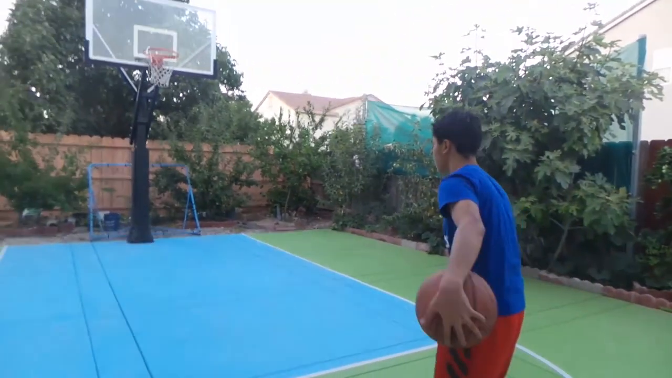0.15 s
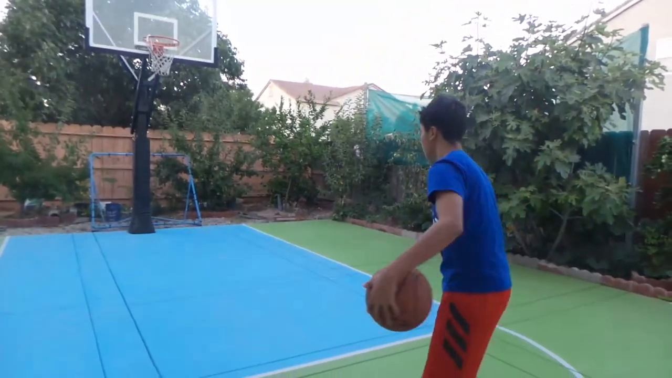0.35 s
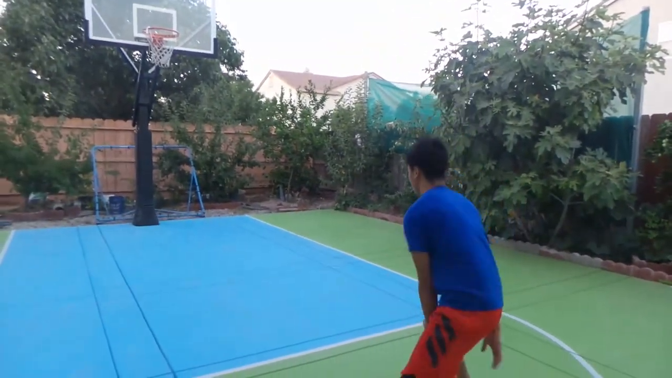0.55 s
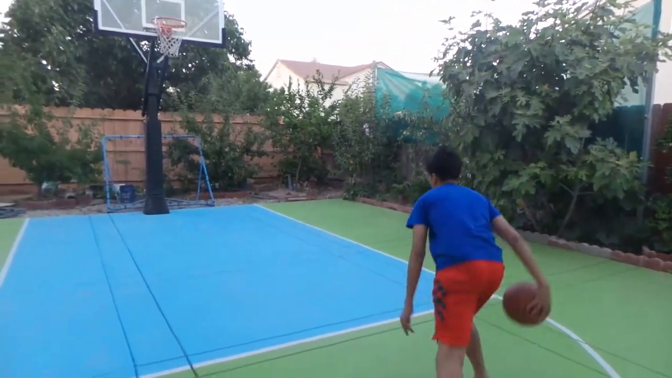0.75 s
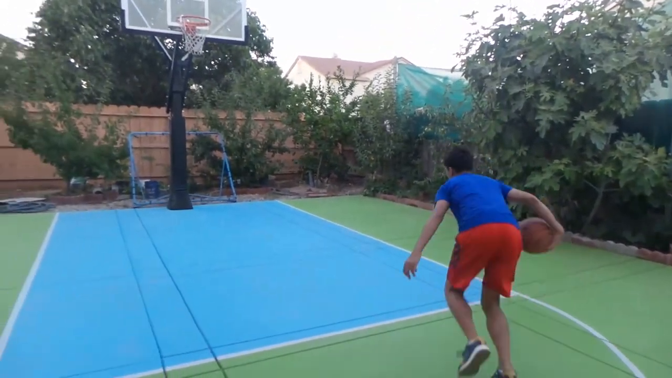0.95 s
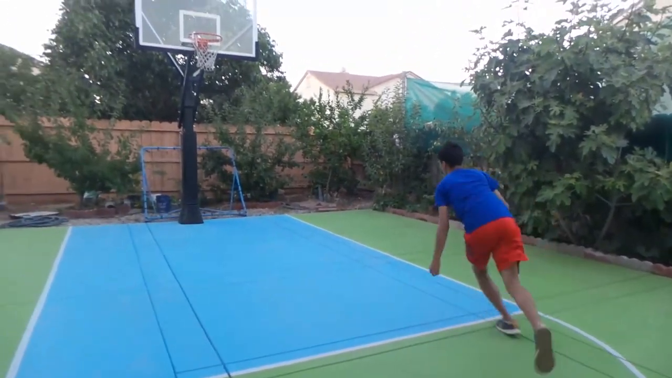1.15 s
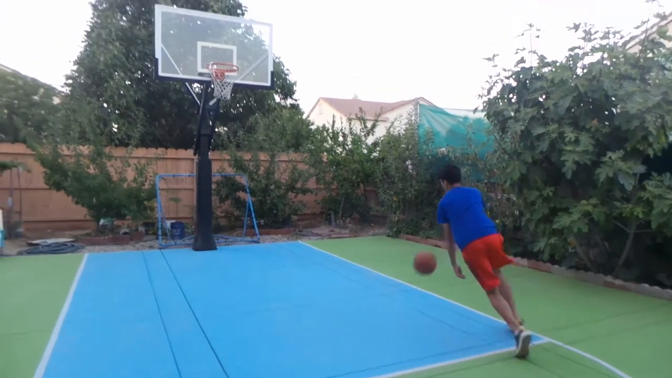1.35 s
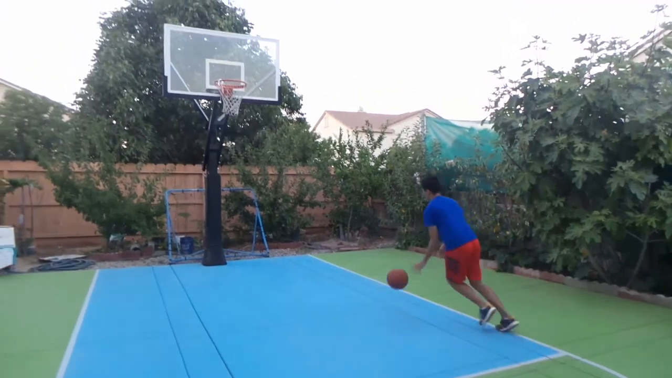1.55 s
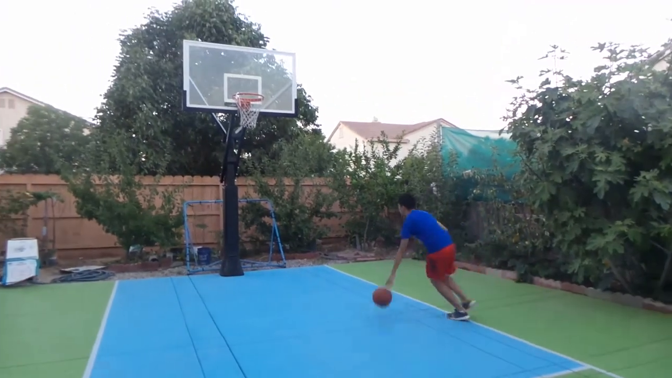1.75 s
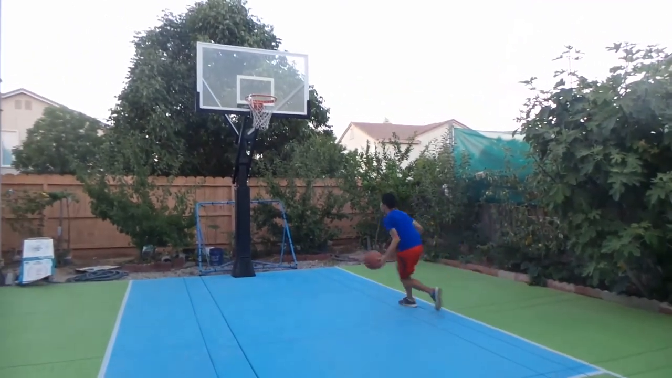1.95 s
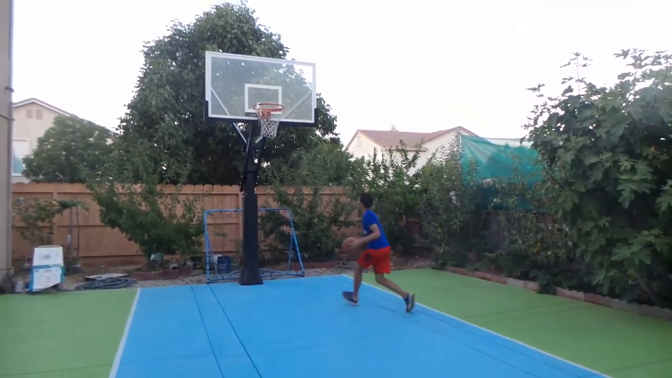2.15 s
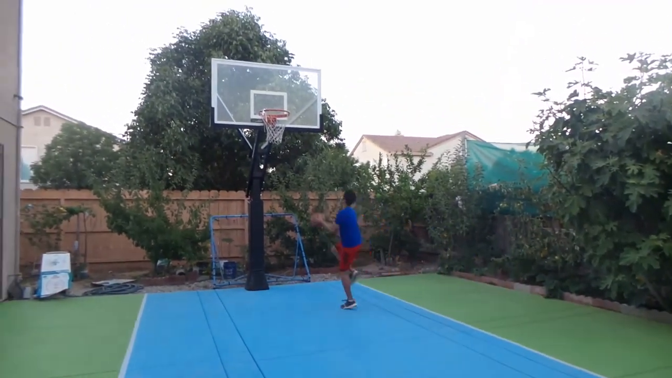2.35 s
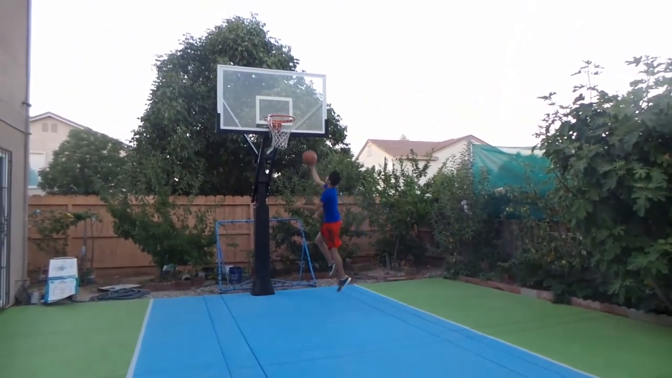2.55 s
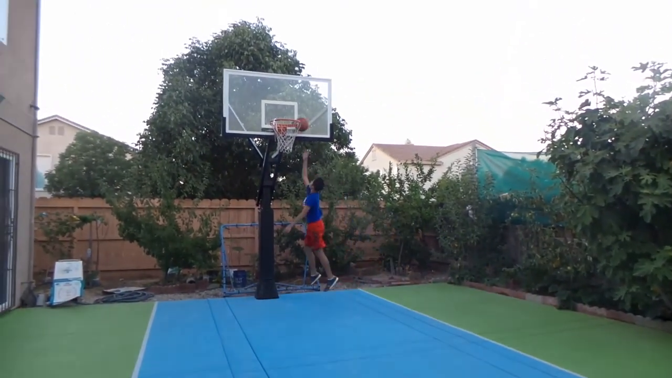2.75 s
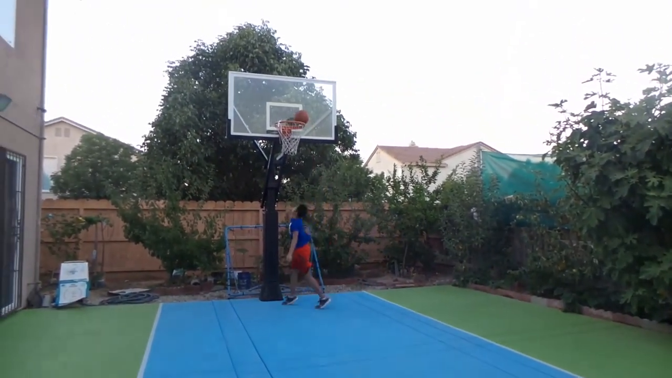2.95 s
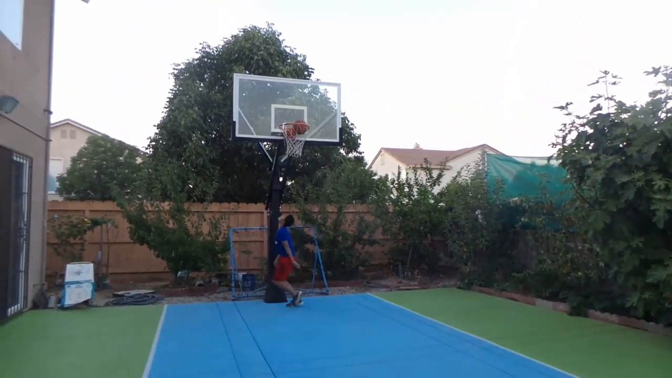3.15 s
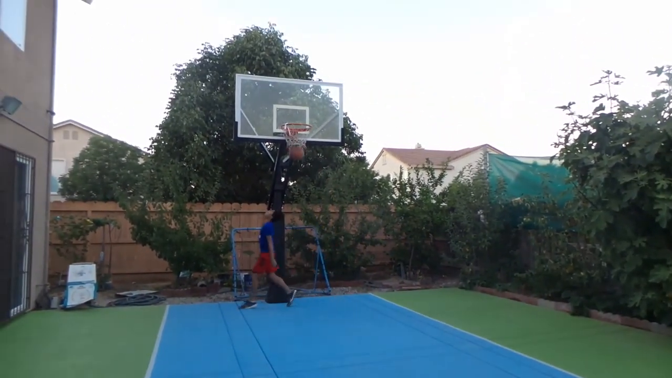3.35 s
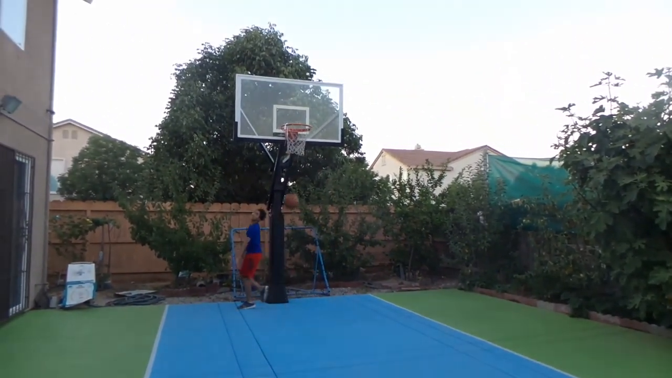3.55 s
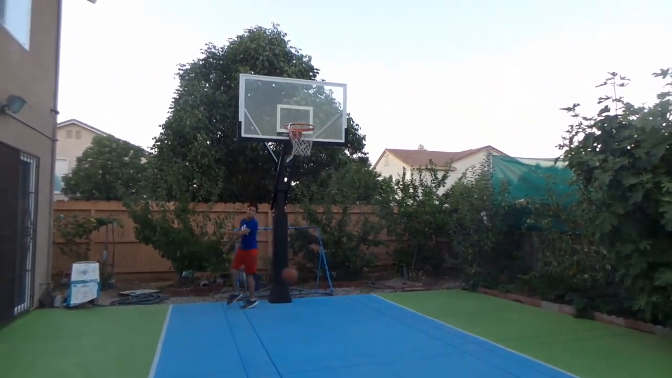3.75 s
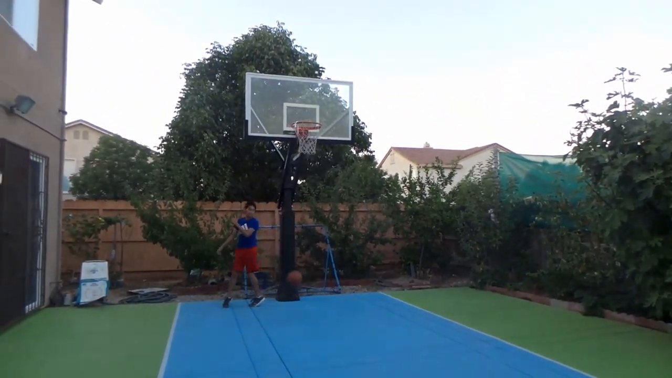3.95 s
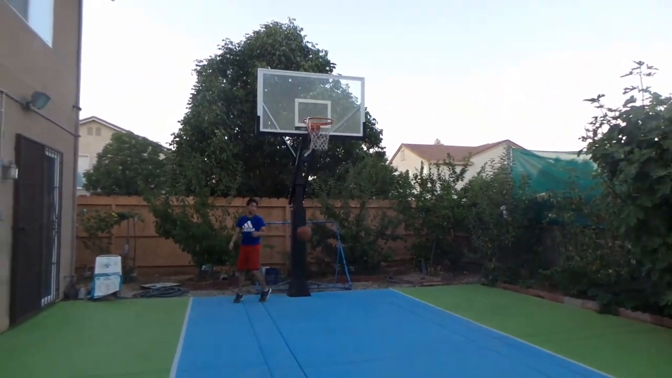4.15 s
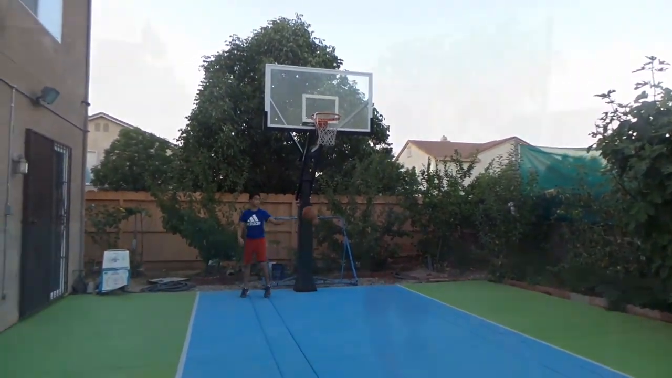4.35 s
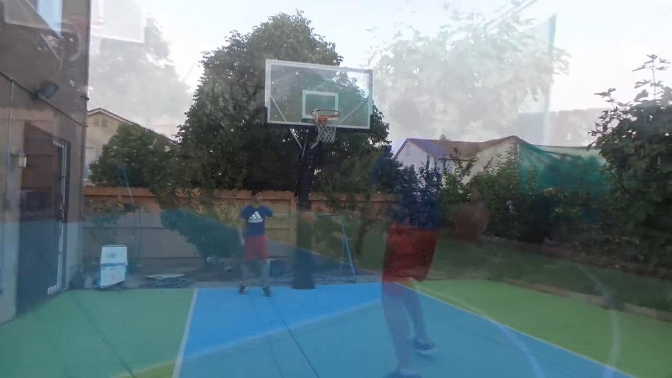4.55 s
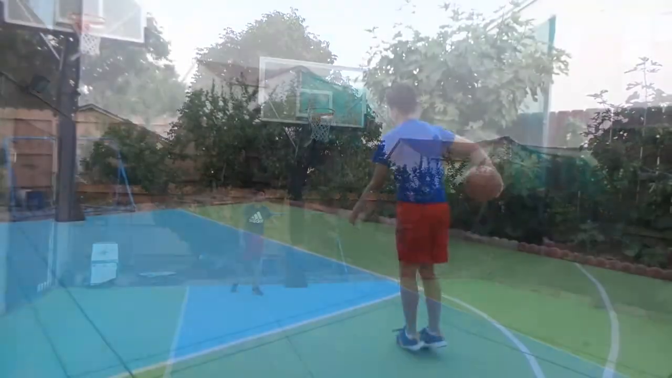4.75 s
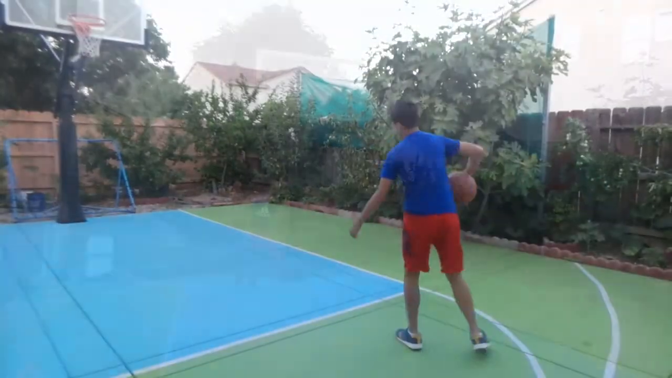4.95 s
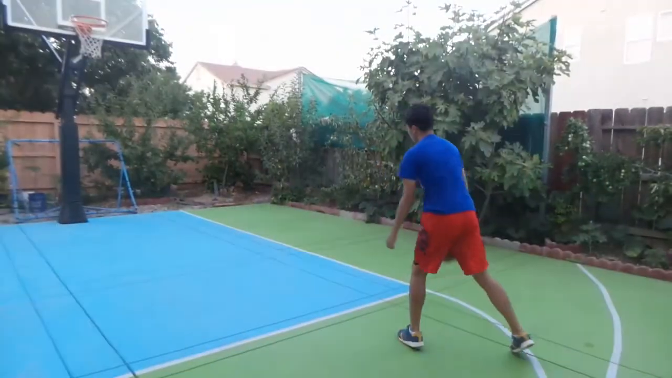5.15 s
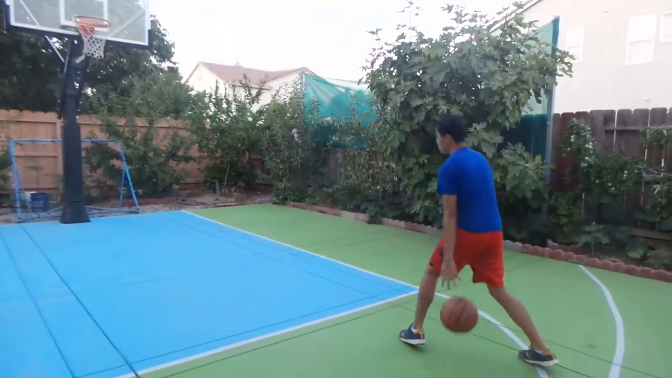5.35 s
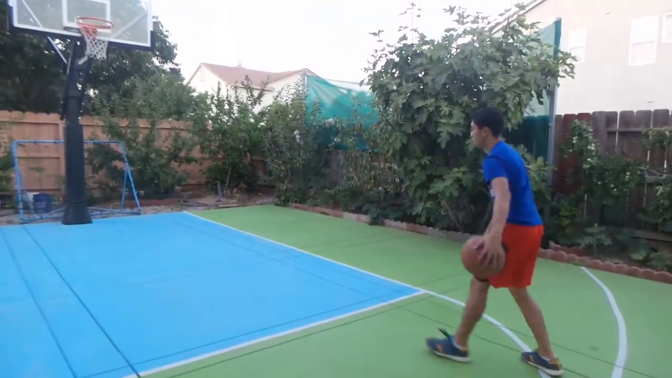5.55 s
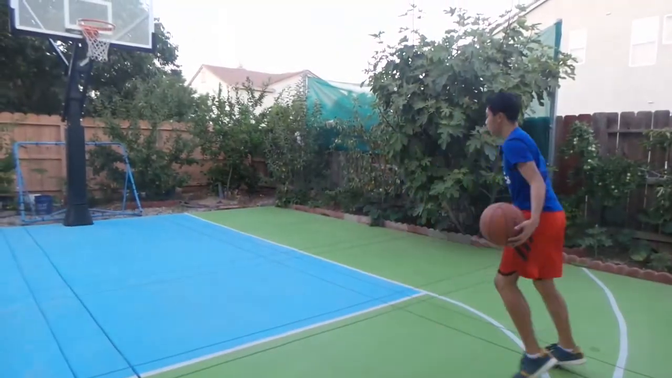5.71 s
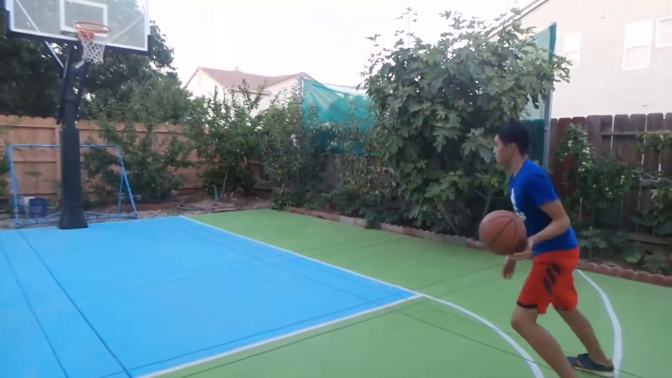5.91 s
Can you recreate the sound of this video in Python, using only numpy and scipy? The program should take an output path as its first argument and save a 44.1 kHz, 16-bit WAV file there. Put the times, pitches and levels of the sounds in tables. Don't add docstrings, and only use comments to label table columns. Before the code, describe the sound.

Irregular dribbling cracks and thumps between fences and walls, soles scuff and knock, far traffic hums, and a faint shrill squeal arches near the end.

```python
import sys
import numpy as np
from scipy import signal
from scipy.fft import rfft, irfft
from scipy.io import wavfile
from scipy.ndimage import uniform_filter1d, minimum_filter1d

SR = 44100
rng = np.random.default_rng(int(sys.argv[2]) if len(sys.argv) > 2 else 0)


def amplitude_ratio(level_db):
    exponent = np.asarray(level_db, float) / 20
    return 10 ** exponent


def file_out(sig):
    cols = np.atleast_2d(sig).T
    lim = np.clip(cols, -1, 1)
    pcm = np.round(lim * 32767).astype(np.int16)
    wavfile.write(sys.argv[1], SR, pcm)


N = 268128
LENGTH = 24576


def unit(x):
    return x / np.sqrt(np.mean(x ** 2))


def colour(x, spectrum):
    hz, db = np.transpose(spectrum)
    f = np.arange(len(x) // 2 + 1) * SR / len(x) + 1
    gain_db = np.interp(np.log(f), np.log(hz), db, left=-70, right=-70)
    return irfft(rfft(x) * amplitude_ratio(gain_db), len(x))


def walk(rate):
    k = int(SR / rate)
    held = np.repeat(rng.standard_normal(N // k + 1), k)
    return 1.3 * uniform_filter1d(uniform_filter1d(held, k), k)[:N]


def fade(t60):
    return np.exp(-np.log(1000) * np.arange(LENGTH) / SR / t60)


def ring(modes, scatter_db, detune):
    t = np.arange(LENGTH) / SR
    x = np.zeros(LENGTH)
    for hz, db, t60 in modes:
        strength, shift = rng.standard_normal(2)
        x += amplitude_ratio(db + scatter_db * strength) * np.sin(2 * np.pi * hz * (1 + detune * shift) * t) * fade(t60)
    return x / np.abs(x).max()


def burst(low_hz, t60, click):
    x = rng.standard_normal(LENGTH) * fade(t60) * (1 - fade(.004))
    x[:7] -= click * np.hanning(7)
    return signal.sosfilt(signal.butter(1, low_hz, "high", fs=SR, output="sos"), x)


def add(out, s, x):
    i = int((s + .0007) * SR)
    out[i:i + len(x)] += x[:len(out) - i]


# time_s, level_db
TRAFFIC = [(0, -2.5), (.4, -5.5), (1.0, 0), (1.6, 4), (2.2, 3.5), (2.55, 1.5), (2.9, 3.5), (3.25, 7.5),
           (3.55, 1.5), (4.0, 3), (4.5, -3), (5.2, -6), (5.6, -1), (6.08, -3.5)]
# freq_hz, density_db
RUMBLE = [(25, 2), (108, 5.5), (168, -1.5), (221, 3.5), (270, -6), (400, -7), (520, -35), (880, -70)]
ROAR = [(180, 5), (300, 1), (661, 3.5), (1000, 1.5), (2200, -14.5), (3000, -17.5), (3900, -48), (5000, -70)]
HISS = [(880, 6), (1500, -3.5), (2680, -14.5), (2910, -6), (3970, -7), (15100, -12), (16000, -16),
        (16500, -48)]


def traffic():
    t, echo = np.arange(N) / SR, far_walls()
    near_db = np.interp(t, *np.transpose(TRAFFIC))
    out = np.zeros(N)
    # spectrum, level_db, share of the nearness, echo_db, flicker_db
    layers = [(RUMBLE, -48, .6, -20, 2.7), (ROAR, -49, 1.05, -30, .4), (HISS, -59, .4, -34, .2)]
    for spectrum, db, share, echo_db, flicker_db in layers:
        noise = unit(colour(rng.standard_normal(N), spectrum))
        strength = np.hypot(amplitude_ratio(db + share * near_db), amplitude_ratio(echo_db) * echo)
        out += noise * strength * amplitude_ratio(flicker_db * walk(9))
    return out


# time_s, level_db
MOTOR = [(0, -73), (.2, -76), (1.3, -73), (1.6, -81), (4.0, -79), (4.5, -77), (4.7, -88), (6.08, -88)]


def motor():
    t = np.arange(N) / SR
    tone = np.sin(2 * np.pi * np.cumsum(2870 + 16 * walk(60)) / SR)
    return tone * amplitude_ratio(np.interp(t, *np.transpose(MOTOR)) + 3.5 * walk(15))


# centre_s, pitch_hz, level_db, length_s
WHINES = [(.08, 1940, -51, .18), (0.757, 2040, -40.5, 0.38), (1.07, 1470, -46, .16),
          (1.35, 1906, -42, 0.41), (2.25, 2017, -41.5, 0.41), (2.66, 1470, -53, 0.099),
          (2.75, 1143, -41, 0.31), (3.2, 2000, -71, 0.15), (4.152, 2010, -49, 0.37),
          (5.713, 1920, -45, 0.21)]


def whines():
    out = np.zeros(N)
    # ratio to pitch, level_db
    band = [(.75, -25), (.96, -12), (1, 0), (1.04, -12), (1.3, -20), (1.65, -30)]
    for s, hz, db, length_s in WHINES:
        passing = np.exp(-(2 * (np.arange(LENGTH) - LENGTH / 2) / SR / length_s) ** 2)
        noise = unit(colour(rng.standard_normal(LENGTH), [(k * hz, d) for k, d in band]))
        song = noise * passing * amplitude_ratio(db - 9)
        start = s - LENGTH / 2 / SR
        add(out, max(start, 0), song[int(max(-start, 0) * SR):])
    return out


# delay_ms, level_db
FENCES = [(3.5, -6), (8.5, -9.5), (12.5, -14.5), (24, -30)]
# freq_hz, level_db under the blow, t60_s
YARD = [(78.5, -12, 0.64), (160, -3, 0.34), (333, -4.5, 0.41), (650, -2, 0.23), (1220, -11, 0.49),
        (2590, -14.5, 0.38), (4400, -18, 0.34), (9050, -13.5, 0.27)]


def yard(x, blow, rise_s):
    out = x.copy()
    for (ms, db), shift in zip(FENCES, rng.uniform(-0.2, 0.12, len(FENCES))):
        lag = int(ms * (1 + shift) * SR / 1000)
        out[lag:] += amplitude_ratio(db) * x[:-lag]
    f = np.arange(LENGTH // 2 + 1) * SR / LENGTH + 1
    grains = rng.standard_normal(LENGTH) * amplitude_ratio(2.0 * rng.exponential(size=LENGTH))
    spray = rfft(grains)
    blow_hz, blow_db = np.transpose(blow)
    for hz, db, t60 in YARD:
        octave = np.clip(1 - np.abs(np.log2(f / hz)), 0, 1) ** .5
        band = irfft(spray * octave) * fade(t60)
        band /= np.sqrt(np.sum(band ** 2) / np.sum(fade(t60) ** 2))
        level_db = db + np.interp(np.log(hz), np.log(blow_hz), blow_db)
        out += amplitude_ratio(level_db) * band * (1 - fade(rise_s + 1.13 / hz))
    return out


# start_s, tick_db, knock_db, knock_hz,
# boom_db
KNOCKS = [(0.4712, -27.5, -32, 402, -44), (0.7081, -39, -30.5, 497, -33.5), (1.1301, -43, -39, 390, -38.5),
          (1.1549, -29, -32, 758, -33), (1.6491, -46, -37, 720, -31.5), (1.966, -20.5, -21.5, 760, -21),
          (2.2612, -28, -30, 342, -28), (2.7604, -55, -41.5, 635, -44), (2.9799, -47, -34.5, 383, -28),
          (3.0334, -24.5, -30.5, 321, -34), (3.3765, -42, -36, 593, -39.5), (4.6932, -45.5, -62, 357, -49),
          (5.2352, -53, -46, 656, -58), (5.8013, -55, -46, 566, -35), (5.907, -40.5, -48, 740, -49),
          (5.9309, -43, -40.5, 650, -44.5),
          (1.4221, -24.5, -30.5, 440, -30.5),
    (5.69, -60, -58, 460, -41),
    (4.78, -62, -52, 460, -51),
]


def knocks():
    out = np.zeros(N)
    contact = np.interp(np.arange(LENGTH) / SR, [0, .006, .008], [1, 1, .3])
    for s, tick_db, knock_db, knock_hz, boom_db in KNOCKS:
        tick = amplitude_ratio(tick_db + 4) * uniform_filter1d(burst(900, .03, click=1.0), 6)
        hollow = [(knock_hz, 0, .1), (1.45 * knock_hz, -11, .06),
                  (2.1 * knock_hz, -8, .05), (3.2 * knock_hz, -15, .04)]
        knock = -amplitude_ratio(knock_db + 11) * contact * ring(hollow, 1.5, .015)
        ground = [(109.0, 0.0, 0.061), (205.7, -4.0, 0.14), (313.0, -4.5, 0.15)]
        boom = amplitude_ratio(boom_db + 6.5) * ring(ground, 6.6, 0.077) * (1 - fade(.02))
        blow = [(150, boom_db - 3), (700, knock_db - 5), (3000, tick_db - 4), (9000, tick_db - 13)]
        add(out, s, yard(tick + knock + boom, blow, rise_s=.04))
    return out


# start_s,
# pitch_hz, level_db
PINGS = [(.606, 750, -15), (.709, 1180, -26), (1.4624, 1370, -10), (1.838, 910, -20), (1.972, 2230, -21),
         (3.891, 1200, -12.5), (4.922, 2343, -21), (5.2985, 1810, -8), (5.322, 1390, -15.5),
         (.472, 796, -23.5), (4.268, 1110, -37)]


def pings():
    out = np.zeros(N)
    touch = np.interp(np.arange(LENGTH) / SR, [0, .001, .0045, .007], [0, 1, 1, .15])
    for s, hz, db in PINGS:
        ping = amplitude_ratio(db) * ring([(hz, 0, .06), (1.33 * hz, -3, .05)], 1, .005) * touch
        band = [(.75 * hz, -25), (.9 * hz, -3), (hz, 0), (1.1 * hz, -6), (1.3 * hz, -25)]
        linger_db = db - 12 - 16 * abs(np.log2(hz / 1200))
        linger = amplitude_ratio(linger_db) * unit(colour(rng.standard_normal(LENGTH), band))
        linger = linger * fade(.42) * (1 - fade(.03))
        blow = [(hz / 2, db - 43), (hz, db - 16), (2 * hz, db - 40)]
        add(out, s, linger + yard(ping, blow, rise_s=.01))
    return out


# freq_hz, density_db
SOLE = [(1470, -40), (2500, -5.5), (2710, -2.5), (3170, -6.5), (5820, -5), (13900, -7.5), (16100, -10),
        (16500, -56)]
# full_strength_s, hiss_db, rise_s, hold_s, rasp_db relative to the hiss
SCUFFS = [(0.478, -41, 0.0039, .004, -19), (0.71, -36.5, .005, .006, 2), (0.825, -53.5, 0.056, 0.032, -1),
          (0.88, -50, .05, 0.011, -3), (1.149, -39, 0.027, 0.023, -4), (1.433, -35, .006, 0.016, -10),
          (1.654, -50.5, 0.018, .006, 8), (1.706, -35, 0.02, 0.0072, -0.5), (1.924, -43, .02, 0.021, -2),
          (2.215, -50.5, .022, 0.056, 11), (2.733, -50, 0.015, 0.0069, 7), (3.009, -39.5, .045, 0.0089, 6),
          (3.403, -43, 0.037, 0.019, -3.5), (4.565, -61, 0.0092, 0.0097, -4), (4.756, -56, .01, .004, -3),
          (4.813, -44, 0.018, 0.0098, -11), (5.232, -55, 0.048, 0.015, -4), (5.619, -39.5, 0.015, 0.05, -6),
          (5.691, -38.5, .015, 0.0065, -7.5), (5.819, -49.5, 0.043, 0.036, -11),
          (5.97, -58.5, 0.064, 0.066, -11)]


def scuffs():
    grains = rng.standard_normal((2, N)) * amplitude_ratio(1.1 * rng.exponential(size=(2, N)))
    hiss = unit(colour(grains[0], SOLE)) * amplitude_ratio(2.0 * walk(90))
    rasp = unit(colour(grains[1], [(500, -8.5), (1200, -1.5), (2200, -6.5), (3500, -9.5), (5000, -19)]))
    rasp = rasp * amplitude_ratio(2.5 * walk(60))
    t, out = np.arange(N) / SR, np.zeros(N)
    for s, hiss_db, rise_s, hold_s, rasp_db in SCUFFS:
        near = np.abs(t - s) < .5
        below_db = 25.5 * np.maximum(s - t[near], 0) / rise_s
        below_db += 264 * np.maximum(t[near] - s - hold_s, 0)
        grit = hiss[near] + rasp[near] * amplitude_ratio(min(rasp_db, 4))
        out[near] += amplitude_ratio(hiss_db - below_db) * grit
    return out


# start_s, thump_db, thump_hz, crack_db, centre_hz of the air modes driven hardest
BOUNCES = [(0.601, -12.5, 127.8, -17, 2260), (1.4612, -18.5, 89, -19, 1290), (1.8257, -14, 107, -13, 2180),
           (3.8891, -13.5, 109.4, -11.5, 1270), (4.2674, -32.5, 135.8, -32, 1100),
           (4.9216, -29, 116, -25, 1050), (5.2973, -14.5, 134.4, -17.5, 1710)]
# freq_hz, level_db, t60_s
BALL = [(915, -4, .06), (1125, -1, .07), (1297, 0, .08), (1385, -1, .06), (1715, 0, .06), (1795, 0, .06),
        (1900, -2, .06), (2010, -2, .06), (2265, -3, .06), (2600, -4, .05), (2880, -5, .06),
        (3260, -6, .05), (3600, -8, .05)]
# ratio to thump_hz, level_db, t60_s
SKIN = [(.72, -26.5, 0.19), (1.018, 5, 0.24), (1.7, -5.5, 0.16)]


def bounces():
    out = np.zeros(N)
    for s, thump_db, thump_hz, crack_db, centre_hz in BOUNCES:
        firm_hz = thump_hz - 100
        drum_db = -3 - 0.33 * firm_hz
        body_db = thump_db - 5.5 - 0.1823 * firm_hz
        ring_db = (thump_db + crack_db) / 2 + 0.8
        crack = amplitude_ratio(crack_db - 2.5) * burst(700, .025, click=9.0)
        skin = [(k * thump_hz, db, t60) for k, db, t60 in SKIN] + [(279.6, drum_db, 0.26)]
        thump = amplitude_ratio(thump_db + 7) * ring(skin, 1.0, .02) * (1 - fade(0.0012))
        court = [(495, -44, 0.053), (627, 42, 0.081), (750, 5, 0.017), (800, 21, 0.058)]
        body = amplitude_ratio(body_db - 2.0) * ring(court, 0.89, 0.098)
        driven = [(hz, db - 45 * np.log2(hz / centre_hz) ** 2, t60) for hz, db, t60 in BALL]
        air = amplitude_ratio(ring_db + 8.5) * ring(driven, 1.5, .005) * (1 - fade(.008))
        flight = amplitude_ratio(ring_db - 42) * ring([(2080, -11, 0.97), (2920, 3, 1.4)], 0.87, 0.0014)
        blow = [(130, thump_db), (300, thump_db + drum_db), (600, body_db),
                (centre_hz, ring_db), (6000, crack_db)]
        heard = flight + yard(crack + thump + body + air, blow, rise_s=0.0071)
        add(out, s + .001, heard)
    return out


def far_walls():
    out = np.zeros(N)
    for s, thump_db, *_ in BOUNCES:
        add(out, s, amplitude_ratio(thump_db) * fade(1.22) * (1 - fade(0.017)))
    return out


# start_s, level_db
SLAPS = [(.6135, -33), (0.649, -24), (1.835, -23), (1.873, -12.5), (3.896, -23), (5.304, -13.5)]


def slaps():
    out = np.zeros(N)
    for s, db in SLAPS:
        add(out, s, amplitude_ratio(db) * burst(2000, 0.013, click=1.9))
    return out


# time_s, pitch_hz, level_db
SQUEAL = [(4.99, 11090, -66), (5.022, 11810, -53), (5.118, 12700, -53), (5.17, 12780, -53),
          (5.23, 12960, -44), (5.29, 12480, -52), (5.38, 11800, -55), (5.42, 11700, -51), (5.53, 9900, -60)]
# start_s, length_s, first and last ratio to pitch_hz, level_db to it
STRANDS = [(4.99, .44, 1, 1, 0), (5.475, .05, .99, 1.02, 0), (5.01, .11, .872, .897, -9),
           (5.115, .065, .88, .825, -6), (5.175, .12, .872, .873, -12), (5.33, .1, .85, .87, -11),
           (5.06, .12, 1.055, 1.03, -8), (5.06, .13, 1.125, 1.11, -9), (5.19, .1, 1.072, 1.06, -4),
           (5.44, .1, 1.31, 1.32, -3)]


def squeal():
    t = np.arange(N) / SR
    s, hz, db = np.transpose(SQUEAL)
    pitch_hz, level_db = np.interp(t, s, hz), np.interp(t, s, db)
    spectrum = [(8500, -12), (10500, -9), (13000, 0), (14500, -7), (15500, -13)]
    haze = unit(colour(rng.standard_normal(N), spectrum)) * amplitude_ratio(-57 + 2.0 * walk(40))
    out = haze * np.clip(np.minimum(t - s[0], s[-1] + 0.099 - t) / 0.14, 0, 1)
    for start_s, length_s, first, last, under_db in STRANDS:
        along = np.clip((t - start_s) / length_s, 0, 1)
        edge = np.clip(np.minimum(along, 1 - along) * length_s / .012, 0, 1)
        strand_hz = pitch_hz * (first + (last - first) * along) + 55 * walk(250)
        whistle = np.sin(2 * np.pi * np.cumsum(strand_hz) / SR)
        out += edge * amplitude_ratio(level_db + under_db + 3 * walk(90)) * whistle
    return out


def scene():
    background = traffic() + motor() + whines()
    shoes = knocks() + scuffs()
    ball = pings() + bounces() + slaps()
    return np.tile(background + shoes + ball + squeal(), (2, 1))


def band_limit(x):
    return signal.sosfilt(signal.butter(12, 17030, fs=SR, output="sos"), x)


def record(dry):
    ahead = int(.005 * SR)
    loudness = uniform_filter1d(np.abs(dry[0]), 40)
    need = np.minimum(1, (.35 / (loudness + 1e-9)) ** .6)
    held = minimum_filter1d(need, 2 * ahead + 1)
    keep = np.exp(-1 / (.06 * SR))
    release = signal.lfilter([1 - keep], [1, -keep], held - 1) + 1
    gain = np.minimum(uniform_filter1d(held, ahead // 2), release)
    wet = signal.sosfilt(signal.butter(4, 50, "high", fs=SR, output="sos"), dry * gain)
    wet = np.tanh(wet / 1.1) * 1.1
    treble = signal.sosfilt(signal.butter(1, 3000, "high", fs=SR, output="sos"), wet[0])
    grain = (amplitude_ratio(-39) * treble + amplitude_ratio(-47) * wet[0]) * walk(300)
    wet = wet + grain * np.array([[1], [-1]])
    wet = signal.sosfilt(signal.ellip(10, .3, 45, 15750, fs=SR, output="sos"), wet)
    return band_limit(wet)


dry = scene()
out = record(dry)
file_out(out)
```